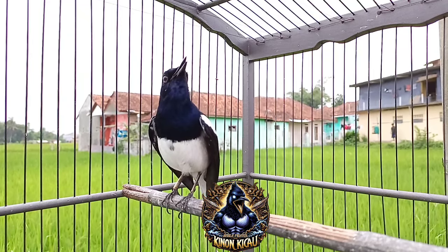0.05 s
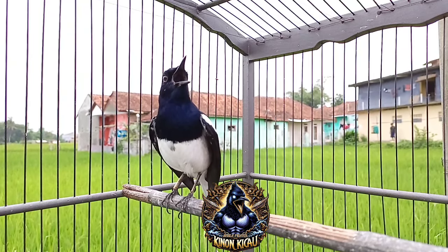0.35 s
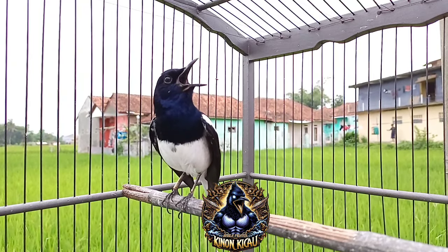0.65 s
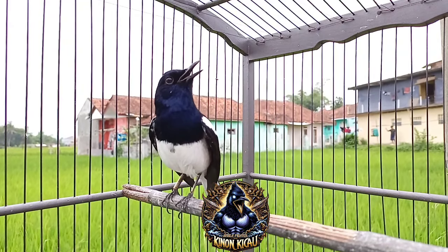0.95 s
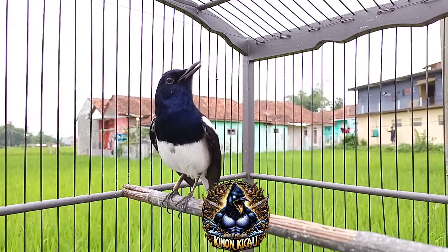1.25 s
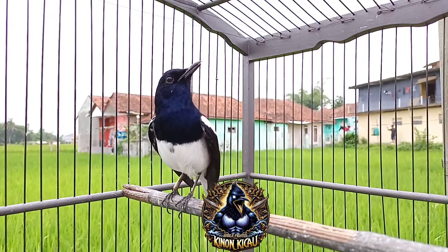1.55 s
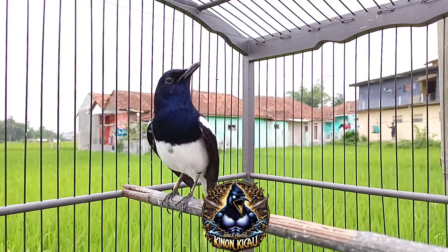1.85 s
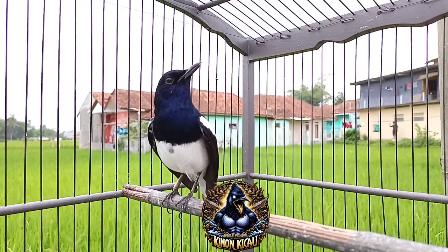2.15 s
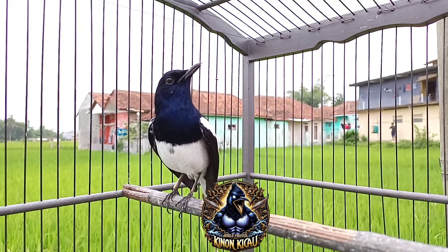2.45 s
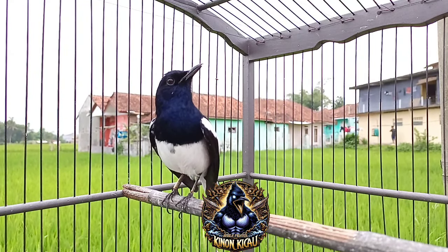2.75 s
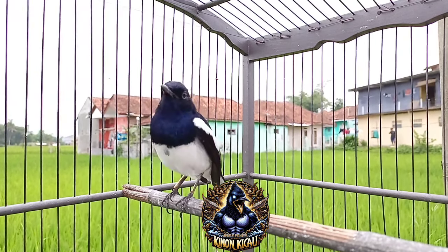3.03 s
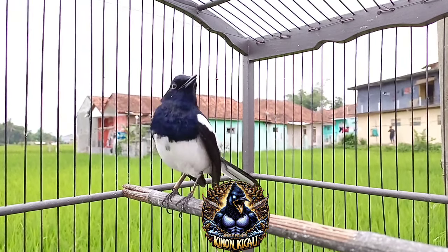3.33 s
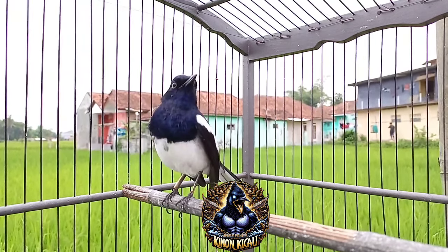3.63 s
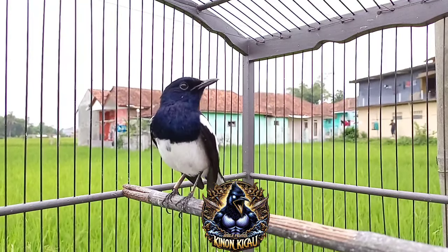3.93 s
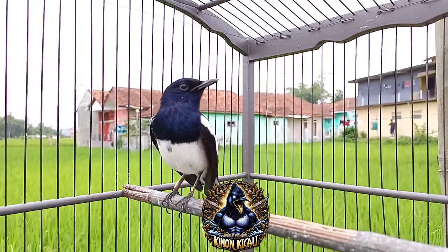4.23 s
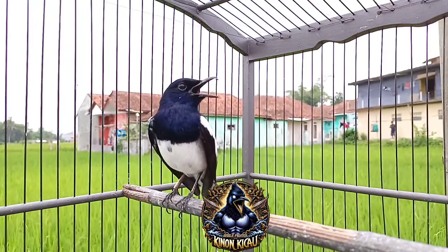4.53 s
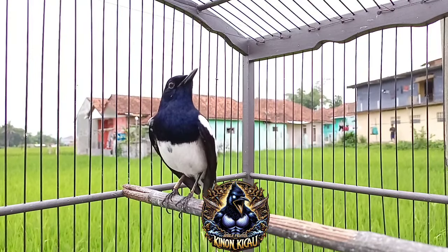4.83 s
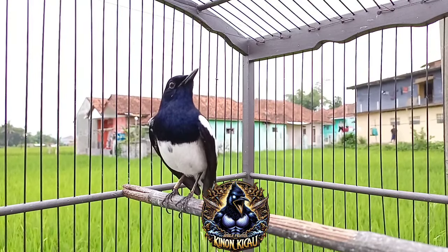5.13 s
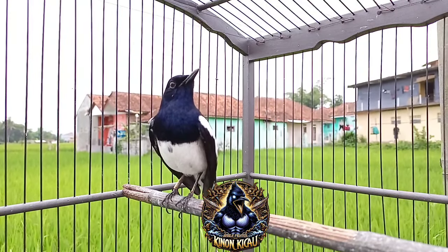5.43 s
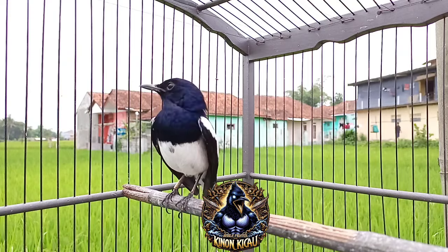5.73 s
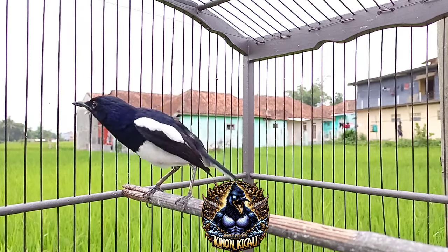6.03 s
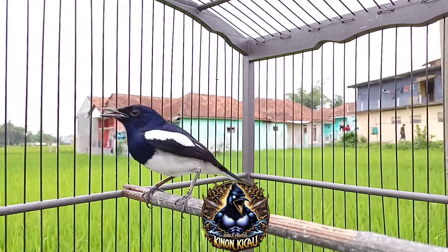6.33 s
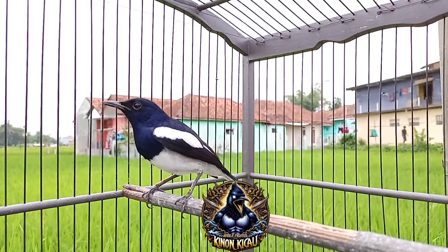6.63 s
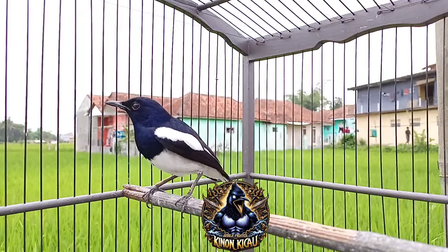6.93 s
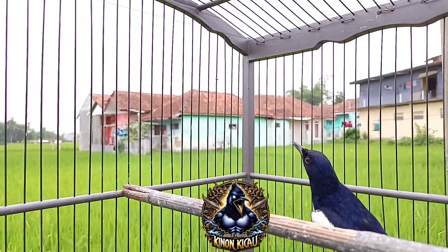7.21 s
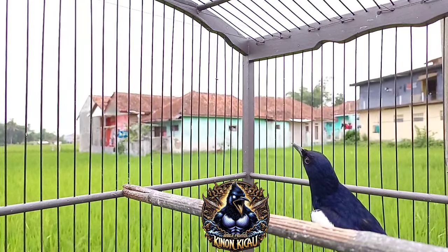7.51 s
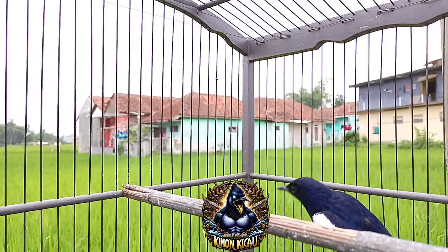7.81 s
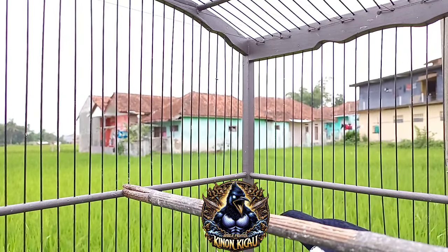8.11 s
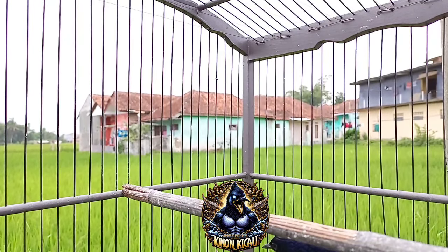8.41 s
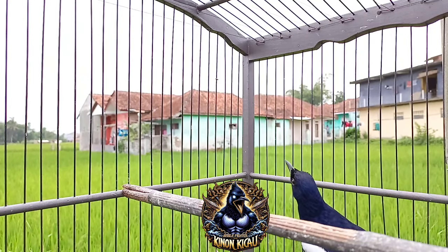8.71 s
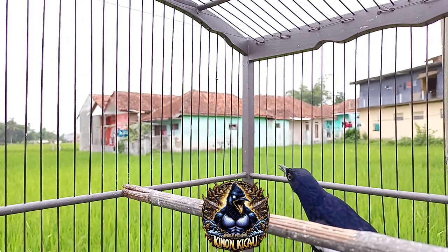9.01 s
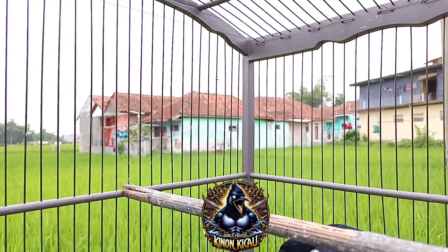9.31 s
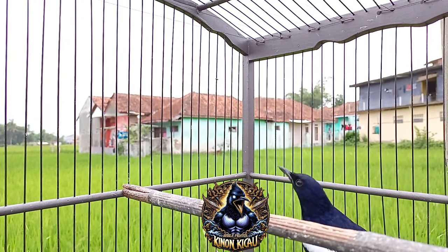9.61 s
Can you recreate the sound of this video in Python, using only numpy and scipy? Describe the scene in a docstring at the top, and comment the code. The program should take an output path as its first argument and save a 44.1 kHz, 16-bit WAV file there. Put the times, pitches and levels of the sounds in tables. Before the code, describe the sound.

A songbird opens close to the microphone with a loud burst of high whistles and quick trilled sweeps. It stops, and farther birds whistle and chack softly with some echo, among a few light ticks and puffs of wind. The near bird gives one short harsh call midway and another near the end. Late on, a faint motor hums and a distant see-saw song starts, over low outdoor rumble and thin hiss.

```python
"""A caged magpie-robin opens close by with 1.6 s of loud whistles and trilled sweeps; the two sides of
its syrinx overlap and beat. Farther birds whistle and chack on, with more echo, among a few light ticks
and wind puffs. The near bird gives a harsh call at 4.7 s. A far motor swells after 7 s, then a see-saw
song starts and the second harsh call follows at 9 s. Low outdoor rumble and thin hiss run throughout."""
import sys
import numpy as np
from scipy import signal
from scipy.fft import rfft, irfft, next_fast_len
from scipy.io import wavfile
from scipy.ndimage import uniform_filter1d, minimum_filter1d

SR = 44100
rng = np.random.default_rng(int(sys.argv[2]) if len(sys.argv) > 2 else 0)


def unload_audio(sound):
    """Save the sound as a 16-bit wav file, at the path given as the first command line argument."""
    columns = np.transpose(np.atleast_2d(sound))
    # keep every value between -1 and 1, then stretch to whole-number steps
    steps = np.round(np.clip(columns, -1, 1) * 32767)
    wavfile.write(sys.argv[1], SR, steps.astype(np.int16))


N = 426006

# opening whistles: overtones/dB, pressed/0-1, [t/s, f/Hz, level/dB]
WHISTLES = [ (-30, .1, [(0, 2581, -6), (.02, 2561, -6), (.03, 2537, -15), (.043, 2500, -32)]),
            (-18, .45, [(0.172, 2174, -40), (0.18, 2181, -31.5), (0.21, 1963, -24.5), (0.244, 2282, -13),
            (0.266, 2270, -17), (0.28, 2251, -28.5)]), (-31, .1, [(0.256, 3510, -35), (0.264, 3606, -26.5),
            (0.294, 3489, -11), (0.338, 3657, -4.5), (0.372, 3700, -4), (0.386, 3577, -10),
            (0.398, 3550, -28)]), (-33.5, 0.44, [(0.476, 4755, -12), (0.486, 4774, -6.5), (0.5, 5010, -8),
            (0.508, 4682, -11.5)]), (-19.5, 0.22, [(.551, 5370, -22), (.559, 6246, -8.5), (.567, 6560, -14),
            (.576, 5930, -6.5), (.584, 6230, -5), (.606, 6463, -16), (.626, 6420, -12.5), (.655, 6202, -5),
            (.672, 6050, -12.5), (.682, 5690, -33.5)]), ]
# air rasp as one side of the syrinx hands over to the other: t/s, length/s, level/dB
HANDOVERS = [(0.176, 0.033, -44), (0.248, 0.032, -33), (0.5, 0.088, -38), (1.297, 0.034, -28.5),
             (1.563, 0.047, -35.5)]
# sweeps: t/s, length/s, climb/(Hz/s), top/Hz, level/dB
SWEEPS = [(0.762, 0.038, 135000, 4438, -6.5), (0.939, .021, 81300, 3730, -7.5),
          (1.141, 0.027, 105000, 4980, -8.5), (1.292, .027, 65500, 4170, -8.5),
          (1.507, 0.025, 58200, 3635, -7)]
# trills: t/s, length/s, hold/s, from/Hz, to/Hz, slide at/s, depth/Hz, level/dB, overtones/dB
TRILLS = [ (0.501, .03, 0.016, 4880, 3163, .013, 219, -9, -15),
          (0.802, 0.06, 0.046, 2975, 4390, 0.042, 170, -6.5, -15.5),
          (.957, 0.07, 0.037, 2758, 4310, .022, 198.6, -7, -15.5),
          (1.159, 0.068, 0.037, 2995, 4150, .026, 320, -8, -14),
          (1.311, .057, 0.034, 2407, 3997, .016, 40, -5, -25.5),
          (1.529, .039, .042, 2854, 3290, .006, 70, -4.5, -34.5),
          (1.565, .055, .03, 2900, 2102, .017, 150, -4, -18), ]
# closing pips: t/s, length/s, f/Hz, level/dB
PIPS = [(0.849, 0.019, 4630, -12.5), (0.996, .027, 5430, -12.5), (1.194, 0.032, 4654, -9.5),
        (1.357, 0.015, 4520, -17)]
# harsh calls: t/s, zigzag length/s, start/Hz, squeal/Hz, drop t/s, drop length/s, level/dB
HARSH_CALLS = [(4.7, .025, 4580, 5500, 4.758, 0.037, -15.5), (8.988, .031, 5915, 5840, 9.055, 0.04, -14.5)]
# squeals, one curve per call: t/s, f/Hz, level/dB
SQUEALS = [
    [(4.724, 5380, -14.5), (4.73, 5490, -20), (4.734, 5500, -44), (4.742, 5260, -46), (4.746, 4950, -23),
     (4.757, 3310, -15)],
    [(9.018, 5970, -10), (9.025, 5300, -12), (9.033, 5960, -9), (9.042, 3140, -16), (9.051, 3940, -22.5),
     (9.056, 3300, -10)],
]
# throat and beak responses: f/Hz, level/dB
WHISTLE_EQ = [(3500, -2.5), (6300, 0.5), (7800, -12), (10500, 4.5), (12800, 0), (13500, -6.5), (15200, 1)]
PRESSED_EQ = [(3800, -8.5), (6300, 2), (7900, -10), (9200, 1), (11000, 3), (13400, -13), (14600, 3)]
HANDOVER_EQ = [(2000, -14), (3500, 0), (6500, -0.5), (8000, -8), (11000, -2), (13300, -10), (15000, -3)]
HARSH_EQ = [(600, -22), (1000, -12.5), (1700, -14), (2300, -9.5), (3200, -1), (5000, -1), (6600, 8.5),
            (8000, -6), (9500, -3.5), (12500, -25.5), (15500, -12.5)]
FAR_HARSH_EQ = [(1000, -48), (2200, -2), (4600, 6.5), (8000, -14), (9700, -10.5), (12500, -25)]
# the cage favours some pitches, so glides flutter: f/Hz, level/dB
CAGE_EQ = [(2250, -11), (2700, -10.5), (2950, -5), (3200, -1.5), (3500, -7), (3780, 1), (4200, -3.5),
           (4460, -0.5), (4900, -5)]

# neighbours' whistles: t/s, length/s, start/Hz, end/Hz, level/dB
HELD_NOTES = [(2.184, 0.16, 3357, 3465, -34.5), (2.5, 0.13, 3095, 3175, -44),
              (2.666, 0.081, 3000, 3200, -34.5), (6.115, 0.093, 3430, 3507, -33.5),
              (6.685, 0.156, 3437, 3487, -33.5), (8.455, 0.079, 3060, 3220, -33.5)]
SLURS = [ (0.334, 0.16, 2030, 1774, -54.5), (0.678, 0.15, 4100, 4240, -54.5), (1.381, .12, 5470, 6520, -54),
         (6.538, 0.078, 3030, 3414, -47.5), (0.556, 0.14, 2743, 2570, -49), (.88, .12, 1604, 2234, -51),
         (1.578, 0.22, 3124, 3468, -46), (2.168, 0.52, 2675, 3130, -48), (2.699, .07, 2993, 2300, -50.5),
         (3.279, 0.039, 1653, 1340, -62), (3.36, 0.057, 1850, 1430, -60), (3.889, 0.061, 3215, 3545, -57),
         (4.861, 0.17, 3040, 3633, -60.5), (5.92, 0.23, 2800, 3406, -48.5),
         (7.299, 0.12, 3950, 4115, -57.5), (7.434, 0.099, 4690, 4640, -46), (7.52, 0.1, 4650, 4510, -52),
         (7.521, 0.2, 5695, 5430, -57), (7.707, 0.13, 2307, 2384, -61), (7.819, 0.13, 4180, 2003, -59.5),
         (8.279, 0.13, 2998, 3460, -43.5), (8.436, 0.098, 2940, 3187, -44),
         (8.561, 0.097, 3090, 1540, -47.5), ]
PHRASE = [(0, .12, 3190, 2393, -49), (.18, .16, 2643, 3240, -45), (0.658, .11, 3216, 2472, -46),
          (.862, .1, 2920, 3160, -42), (.97, 0.074, 3130, 2406, -51)]  # t from phrase start
# phrase starts: t/s
PHRASE_STARTS_S = [1.8, 6.3]
# see-saw song: t/s, start/Hz, flip after/s, level/dB
SEESAWS = [(8.738, 3907, 0.084, -39.5), (9.096, 4313, 0.081, -37.5), (9.476, 4466, 0.092, -38)]
# chack series: t/s, level/dB
CHACKS = [(2.81, -59), (3.168, -46), (3.383, -54), (3.594, -46.5), (3.805, -51), (4.022, -53.5),
          (4.247, -58)]
# hoarse glides: t/s, length/s, start/Hz, end/Hz, level/dB, roughness (capped at 1)
FAR_CHIPS = [ (2.42, .19, 3380, 3004, -53, 0.75), (2.241, 0.063, 3620, 4700, -58, .4),
             (3.5, 0.078, 2800, 5290, -41, .45), (3.569, .24, 4920, 4160, -53, .6),
             (4.351, 0.067, 3300, 4300, -60, .15), (4.567, 0.03, 4450, 3080, -55, .1),
             (5.07, .05, 5600, 3750, -63.5, .7), (5.226, 0.067, 3340, 2770, -58, 1.1),
             (5.406, .036, 5000, 3710, -54.5, 0.39), (5.805, 0.1, 6080, 3770, -57, 0.82),
             (7.058, 0.044, 4500, 4320, -52, 0.48), ]
# chirp bursts: t/s, length/s, level/dB
TWITTERS = [(4.88, .02, -59), (5.881, .09, -51.5), (6.03, .08, -55), (6.139, .02, -55), (6.59, .02, -53)]
# cracked call curve: t/s, f/Hz, level/dB
CRACKED_CALL = [(2.95, 5100, -54.5), (3.02, 4560, -42.5), (3.06, 4126, -44), (3.1, 5050, -47),
                (3.155, 5350, -46), (3.21, 3500, -48)]

# light ticks, wind puffs: t/s, level/dB
TICKS = [(1.966, -35.5), (3.083, -42), (6.277, -37), (7.245, -44.5), (7.504, -40.5)]
BUFFETS = [(2.129, -44), (2.24, -51.5), (2.78, -50.5), (3.35, -44.5), (3.92, -45.5), (4.0, -38),
           (4.13, -45), (4.23, -41), (4.37, -46), (6.599, -45)]
# noise spectra: f/Hz, level/dB
TICK_EQ = [(500, -29), (1500, -19), (3000, 9.5), (5500, -2.5), (9000, -13.5), (15000, -31)]
RUMBLE_EQ = [(25, -42.5), (65, -3), (120, 0), (260, -13.5), (450, -21), (600, -16), (800, -35.5),
             (2000, -67)]
WASH_EQ = [(600, -27.5), (1200, -8.5), (1600, -5), (2500, -20), (5000, -60)]
HISS_EQ = [(600, -0.5), (800, -11.5), (2300, -25.5), (3500, -18), (4700, -18), (5200, -21), (7800, -25.5),
           (9600, -10), (11500, -32), (16000, -39)]
# background envelopes: t/s, level/dB
INSECT_DB = [(0, -72), (4.1, -76), (5.6, -70.5), (7.6, -68.5), (7.9, -89)]
RUMBLE_DB = [(0, -51.5), (.35, -74), (.65, -58), (.9, -53.5), (1.5, -64), (2.2, -55), (2.6, -60.5),
             (4.1, -53), (4.6, -56), (5.4, -69), (6.2, -54), (6.65, -53.5), (7.1, -55.5), (9.66, -62)]
WASH_DB = [(0, -45), (.4, -73.5), (1.2, -67), (3.3, -76), (4.2, -85), (5.4, -82), (6.2, -64), (7.1, -83),
           (7.7, -71), (8.3, -88), (9.66, -78.5)]
HISS_DB = [(0, -68.5), (1.6, -66.5), (3.2, -62.5), (5.3, -65.5), (6.5, -63), (7.6, -63.5), (8.2, -66.5),
           (9.66, -65.5)]
MOTOR_DB = [(7.1, -77), (7.5, -49), (7.75, -58), (8.0, -53), (8.35, -52.5), (8.55, -65), (8.75, -53.5),
            (9.1, -65.5), (9.35, -52.5), (9.66, -65.5)]
# thin far hum: f/Hz, level/dB re hiss, waver/fraction
HUM = [(577, -7.5, 0.037)]
# echo decay before t60_factor: f/Hz, T60/s
ECHO_T60_S = [(2500, .8), (6000, .85), (10000, .6), (13000, .45), (16000, 0.052)]


def song(coupling=.05):
    """Both sides of the syrinx sound together and mix into sum tones."""
    out = np.zeros(N)
    for overtones_db, pressed, rows in WHISTLES:
        at_s, hz, db = follow(rows)
        add(out, at_s, note(hz, db, overtones_db, pressed, WHISTLE_EQ))
    for at_s, length_s, db in HANDOVERS:
        size = round(length_s * SR)
        add(out, at_s, amp(db) * np.hanning(size) * noise(size, HANDOVER_EQ))
    out += place(sweep, SWEEPS) + place(trill, TRILLS) + place(pip, PIPS)
    return highpass(out, 1550) + coupling * highpass(out ** 2, 5000)


def sweep(length_s, climb_hz_per_s, top_hz, db, from_hz=2404, rise_s=.0046):
    """One side of the syrinx shoots up to a top pitch."""
    t, _ = clock(length_s)
    hz = uniform_filter1d(np.minimum(from_hz + climb_hz_per_s * t, top_hz), size=200)
    return note(hz, db + read(CAGE_EQ, hz), overtones_db=-29.5, pressed=.86) * (1 - np.exp(-t / rise_s))


def trill(length_s, hold_s, from_hz, to_hz, slide_at_s, depth_hz, db, overtones_db):
    """The other side warbles while sliding between two pitches."""
    rate_hz, slide_s, rise_s, fade_db_per_s = 134.6, .006, .007, 749.5
    t, _ = clock(length_s)
    release_s = np.maximum(t - hold_s, 0)
    warble = np.cos(phase_of(rate_hz * (1 + .082 * wander(len(t), 52))))
    centre_hz = from_hz + (to_hz - from_hz) / (1 + np.exp((slide_at_s - t) / slide_s))
    hz = centre_hz + depth_hz * warble * np.exp(-release_s / .012)
    tone = note(hz, db + read(CAGE_EQ, hz) - fade_db_per_s * release_s, overtones_db, pressed=1)
    return tone * np.sqrt(np.minimum(t / rise_s, 1))


def pip(length_s, hz, db, sag=.0647, fade_db=16):
    """A short sagging note closes a syllable."""
    _, u = clock(length_s)
    return note(hz * (1 + sag * (.5 - u)), db - fade_db * u ** 3, overtones_db=-29.5, pressed=.35)


def note(hz, db, overtones_db, pressed, eq=PRESSED_EQ):
    """One side of the syrinx; the more pressed, the more it rasps."""
    size = len(hz)
    jitter = 1 + .005 * pressed * wander(size, 600)
    tone = whistle(hz * jitter, overtones_db, fall_db=7 * pressed, eq=eq, grain_db=3.5 * pressed)
    air = amp(-33) * pressed ** 2 * highpass(noise(size, eq), 4000)
    shimmer = 1 + .018 * pressed * wander(size, 1500)
    flutter_db = 1.17 * pressed * wander(size, 200)
    return soften((tone * shimmer + air) * amp(db + flutter_db), edge_s=.0035)


def whistle(hz, overtones_db, fall_db, eq=WHISTLE_EQ, grain_db=1):
    """Near-pure tone; closing membranes add weak overtones, coloured by the beak."""
    phase = phase_of(hz)
    overtones = np.zeros(len(hz))
    for k in range(2, 8):
        db = read(eq, k * hz) - fall_db * (k - 2) + grain_db * wander(len(hz), 300)
        overtones += amp(db) * (k * hz < SR / 2) * np.sin(k * phase)
    return np.sqrt(2) * (np.sin(phase) + amp(overtones_db) * overtones)


def harsh_calls():
    """The near bird zigzags up to a squeal, then drops into a rattle."""
    out = np.zeros(N)
    for at_s, length_s, start_hz, squeal_hz, drop_at_s, drop_length_s, db in HARSH_CALLS:
        add(out, at_s, zigzag(length_s, start_hz, squeal_hz, db))
        add(out, drop_at_s, rattle(drop_length_s, db - 2.5))
    for rows in SQUEALS:
        at_s, hz, db = follow(rows)
        add(out, at_s, harsh_voice(hz, db, rough=.094))
    return highpass(amp(-1) * out + amp(-15) * echo(out, t60_factor=.066, delay_s=.000998), 600)


def zigzag(length_s, start_hz, squeal_hz, db, centre_hz=3234, depth_hz=630, cycles=2.4, rough=.22):
    """Swinging pitch, with a half-pitch tone at the onset."""
    _, u = clock(length_s)
    swing_hz = centre_hz + depth_hz * np.cos(2 * np.pi * cycles * (u - .56))
    leaving, arriving = np.exp(-(u / .2) ** 2), np.exp(-((1 - u) / .14) ** 2)
    hz = swing_hz + (start_hz - swing_hz) * leaving + (squeal_hz - swing_hz) * arriving
    return harsh_voice(hz, db - 9 * leaving, rough) + harsh_voice(hz / 2, db - 3.5 - 45 * u ** 2, rough)


def rattle(length_s, db, from_hz=3200, to_hz=984, drop_s=.0045, fade_db=26):
    """The voice plunges, catches once and roughens."""
    t, u = clock(length_s)
    catch_hz = 520 * np.exp(-((t - .013) / .004) ** 2)
    hz = to_hz + (from_hz - to_hz) * np.exp(-t / drop_s) + catch_hz
    return harsh_voice(hz, db - fade_db * u ** 2, rough=.34 * u ** .32)


def harsh_voice(hz, db, rough):
    """A stretch of pressed, fluttering voice."""
    gain = amp(db + 2.05 * wander(len(hz), 580))
    return soften(gain * rasp(hz, rough, HARSH_EQ, jitter=.152, hiss=.26), edge_s=.0014)


def rasp(hz, rough, throat_eq, jitter, hiss):
    """Unsteady pulses and air noise, rippling each cycle, pass the throat."""
    rough = np.clip(rough, 0, 1)
    phase = phase_of(hz * (1 + jitter * rough * wander(len(hz), 1400)))
    k = np.arange(1, 17)[:, None]
    weight = amp(read(throat_eq, k * hz)) * (k * hz < SR / 2) / k ** .32
    pulses = np.sqrt(2) * (weight * np.cos(k * phase)).sum(0) / np.linalg.norm(weight, axis=0)
    air = unit(highpass(noise(len(hz), throat_eq), .92 * hz.min()) * (1 + .083 * np.cos(phase)))
    air_share = np.clip(hiss * rough ** 1.58, 0, 1)
    return np.sqrt(1 - air_share) * pulses + np.sqrt(air_share) * air


def held_notes(swell_db=4):
    """A neighbour's firm whistles, swelling towards the end."""
    out = np.zeros(N)
    for at_s, length_s, start_hz, end_hz, db in HELD_NOTES:
        _, u = clock(length_s)
        hz = start_hz + (end_hz - start_hz) * np.sin(np.pi / 2 * u)
        tone = whistle(hz, overtones_db=-30.5, fall_db=19.5)
        add(out, at_s, soften(amp(db - swell_db * (1 - u)) * tone, edge_s=.026))
    return out


def far_birds():
    """A repeated phrase, single slurs, a see-saw song, chacks and hoarse glides."""
    out = np.zeros(N)
    for at_s in PHRASE_STARTS_S:
        add(out, at_s, place(slur, PHRASE))
    out += place(slur, SLURS) + seesaw()
    for at_s, db in CHACKS:
        add(out, at_s, chip(length_s=.053, start_hz=2400, end_hz=1756, db=db, rough=.54))
    return out + place(chip, FAR_CHIPS)


def seesaw(scoop_hz=717, flip_hz=1860, flip_s=.004, hold_s=.024, fall_after_s=.15):
    """A scoop flips upward, then a fall; heard partly via the walls."""
    out = np.zeros(N)
    for at_s, start_hz, flip_at_s, db in SEESAWS:
        t, u = clock(flip_at_s + hold_s)
        hz = start_hz + scoop_hz * np.minimum(t / flip_at_s, 1) ** 2
        hz += flip_hz / (1 + np.exp((flip_at_s - t) / flip_s))
        add(out, at_s, far_note(hz, db - 6.5 * u ** 4, overtones_db=-19.5, jitter=.013))
        add(out, at_s + fall_after_s, slur(length_s=.18, start_hz=4300, end_hz=2799, db=db - 5, ease=4.6))
    return amp(-2) * out + amp(-3) * echo(out, t60_factor=.24, delay_s=.0037)


def slur(length_s, start_hz, end_hz, db, ease=None):
    """A far whistle glides fast, then settles; by default less so when falling."""
    _, u = clock(length_s)
    ease = ease or (2.6 if end_hz > start_hz else .97)
    return far_note(start_hz + (end_hz - start_hz) * np.expm1(-ease * u) / np.expm1(-ease), db)


def far_note(hz, db, overtones_db=-29, jitter=.027):
    """A far whistle swells, wavers and fades."""
    size = len(hz)
    waver = jitter * np.ptp(hz) / hz.mean() * wander(size, 300) + .004 * wander(size, 35.004)
    tone = whistle(hz * (1 + waver), overtones_db, fall_db=22.5)
    arch = abs(np.sin(np.pi * np.linspace(0, 1, size) ** .88)) ** .7
    return wall_bounces(amp(db + .77 * wander(size, 45)) * tone * arch)


def chip(length_s, start_hz, end_hz, db, rough):
    """A short hoarse glide."""
    hz = np.geomspace(start_hz, end_hz, round(length_s * SR))
    return soften(amp(db) * rasp(hz, rough, FAR_HARSH_EQ, jitter=.114, hiss=1), length_s / 3)


def twitter(gap_s=.056, top_hz=5600, bottom_hz=3800):
    """Tiny falling chirps, uneven in time, pitch and level."""
    out = np.zeros(N)
    for burst_s, length_s, db in TWITTERS:
        for at_s in np.arange(burst_s, burst_s + length_s, gap_s):
            late, shift, loud = rng.standard_normal(3)
            hz = np.geomspace(top_hz, bottom_hz, SR // 45) * (1 + .15 * shift)
            chirp = 2 * np.hanning(len(hz)) * np.sin(phase_of(hz))
            add(out, at_s + gap_s * late / 10, amp(db + 2 * loud) * chirp)
    return out


def cracked_call(break_db=4.5):
    """A hoarse voice dips and climbs, breaking up in pitch and level."""
    out = np.zeros(N)
    at_s, hz, db = follow(CRACKED_CALL)
    hz = hz * (1 + .0248 * wander(len(hz), 256))
    voice = rasp(hz, rough=.24, throat_eq=FAR_HARSH_EQ, jitter=.12, hiss=.69)
    breaks = unit(amp(break_db * wander(len(hz), 110)))
    add(out, at_s, soften(amp(db) * breaks * voice, edge_s=.0035))
    return out


def tick(db, t60_s=.02):
    """A small tap that dies at once."""
    t = np.arange(2048) / SR
    return amp(db - 60 * t / t60_s) * noise(len(t), TICK_EQ)


def insect(hz=4720):
    """A soft grainy trill that fades out near the end."""
    return level(INSECT_DB) * amp(2 * wander(N, 9)) * unit(np.sin(wavering_phase(hz, .03, rate_hz=400)))


def buffet(db, rise_s=.02, band_hz=(67, 193)):
    """A low puff of wind: quick swell, slower fall."""
    t = np.arange(SR // 4) / SR
    band = signal.butter(3, band_hz, "band", fs=SR, output="sos")
    puff = unit(signal.sosfilt(band, rng.standard_normal(len(t))))
    return amp(db) * puff * t / rise_s * np.exp(1 - t / rise_s)


def rumble(gust_db=3):
    """Gusty low outdoor noise."""
    low = patchy(noise(N, RUMBLE_EQ), patch_db=2.5)
    return highpass(low * level(RUMBLE_DB) * amp(gust_db * wander(N, 29)), 38)


def far_wash(tones_hz=(1100, 1500)):
    """Echoes of two wavering tones in patchy noise."""
    tones = sum(np.sin(wavering_phase(hz, .1, rate_hz=7.4)) * amp(2 * wander(N, 10)) for hz in tones_hz)
    smeared = unit(echo(tones, t60_factor=.52, delay_s=0))
    return unit(smeared + 1.7 * patchy(noise(N, WASH_EQ), patch_db=5.5)) * level(WASH_DB)


def hiss_and_hum():
    """Thin hiss and a far hum under one envelope."""
    out = patchy(noise(N, HISS_EQ), patch_db=3) * amp(1.5 * wander(N, 2.3))
    for hz, db, waver in HUM:
        out += amp(db + 1.3 * wander(N, 9)) * unit(np.sin(wavering_phase(hz, waver, rate_hz=60)))
    return out * level(HISS_DB)


def motor(hz=116.4):
    """A far motor: three harmonics of an unsteady pitch."""
    phase = wavering_phase(hz, .039, rate_hz=12)
    tone = unit(np.sin(phase) + amp(-9.5) * np.sin(2 * phase) + amp(-14.5) * np.sin(3 * phase))
    return level(MOTOR_DB) * amp(1.5 * wander(N, 6)) * tone


def echo(x, t60_factor, delay_s, taps_per_s=3000):
    """Scattered reflections off walls and roofs; treble dies first."""
    taps = rng.standard_normal(SR) * (rng.random(SR) < taps_per_s / SR)
    hz, t, spectra = signal.stft(taps, SR, nperseg=256)
    t60_s = t60_factor * read(ECHO_T60_S, hz)[:, None]
    tail = signal.istft(spectra * amp(-60 * t / t60_s), SR, nperseg=256)[1]
    tail = np.pad(tail, (round(delay_s * SR), 0))
    return signal.fftconvolve(x, tail / np.linalg.norm(tail))[:N]


def wall_bounces(x, paths=4):
    """Each far note takes its own few paths off the house walls."""
    out = np.pad(x, (0, SR // 4))
    for lag, strength in rng.random((paths, 2)):
        delay_s = .17 * (.12 + .85 * lag)
        add(out, delay_s, amp(-16) * strength * x)
    return out


def patchy(x, patch_db):
    """Distant sound swells and sinks in patches of time and pitch."""
    spectra = signal.stft(x, nperseg=1024)[2]
    field = uniform_filter1d(rng.standard_normal(spectra.T.shape), size=9, axis=0)
    field = unit(uniform_filter1d(field, size=6, axis=1)).T
    return unit(signal.istft(spectra * amp(patch_db * field), nperseg=1024)[1][:N])


def amp(db):
    """dB to gain."""
    return 10 ** (np.asarray(db) / 20)


def unit(x):
    """Scale to rms 1."""
    return x / np.sqrt(np.mean(x ** 2) + 1e-20)


def clock(length_s):
    """Time t/s and elapsed fraction u."""
    t = np.arange(max(round(length_s * SR), 64)) / SR
    return t, t / t[-1]


def phase_of(hz):
    """Running phase/rad."""
    return 2 * np.pi * np.cumsum(hz) / SR


def wavering_phase(hz, waver, rate_hz):
    """Scene-long phase/rad of an unsteady pitch."""
    return phase_of(hz * (1 + waver * wander(N, rate_hz)))


def read(table, hz):
    """Table lookup on a log-frequency axis."""
    table_hz, value = np.transpose(table)
    return np.interp(np.log(hz + 1), np.log(table_hz + 1), value)


def follow(rows):
    """Start time and per-sample columns of a curve."""
    times_s, *columns = np.transpose(rows)
    t, _ = clock(times_s[-1] - times_s[0])
    return [times_s[0]] + [np.interp(times_s[0] + t, times_s, column) for column in columns]


def level(rows):
    """Envelope table to scene-long gain."""
    return amp(np.interp(np.arange(N) / SR, *np.transpose(rows)))


def add(mix, at_s, sound):
    """Mix in at at_s."""
    part = mix[round(at_s * SR):][:len(sound)]
    part += sound[:len(part)]


def place(source, rows):
    """One sound per row: start time, then the source's arguments."""
    out = np.zeros(N)
    for at_s, *settings in rows:
        add(out, at_s, source(*settings))
    return out


def noise(size, eq):
    """Shaped noise, rms 1."""
    gain = amp(read(eq, np.fft.rfftfreq(size, 1 / SR)))
    return unit(irfft(rfft(rng.standard_normal(size)) * gain, size))


def wander(size, rate_hz):
    """Smooth random motion, rms about 1."""
    padded = next_fast_len(size + SR // 8)
    lowpass = np.exp(-(np.fft.rfftfreq(padded, 1 / SR) / rate_hz) ** 2)
    return unit(irfft(rfft(rng.standard_normal(padded)) * lowpass, padded))[:size]


def soften(x, edge_s):
    """Fade both ends."""
    t = np.arange(len(x)) / SR
    return x * np.sin(np.pi / 2 * np.minimum(np.minimum(t, t[::-1]) / edge_s, 1)) ** 2


def highpass(x, hz):
    """Fourth-order low cut."""
    return signal.sosfilt(signal.butter(4, hz, "high", fs=SR, output="sos"), x)


def scene():
    """Near bird almost dry; more echo with distance."""
    near = song() + harsh_calls()
    near += (amp(-21) * echo(near, t60_factor=.1, delay_s=.0021)
             + amp(-40) * echo(near, t60_factor=1, delay_s=.017))
    near += amp(-29) * echo(highpass(near, 3900), t60_factor=.28, delay_s=.012)  # treble reaches walls
    ticks = place(tick, TICKS)
    middle = held_notes() + ticks + amp(-5) * echo(ticks, t60_factor=.25, delay_s=.002)
    middle += amp(-12) * echo(middle, t60_factor=.81, delay_s=.025)
    far = far_birds() + twitter() + cracked_call()
    far += (amp(-6) * echo(far, t60_factor=.28, delay_s=.002)
            + amp(-10.5) * echo(far, t60_factor=.99, delay_s=.012))
    background = insect() + rumble() + place(buffet, BUFFETS) + far_wash() + hiss_and_hum() + motor()
    return (near + middle + far + background)[None]


def record(dry):
    """Fast peak limiter, then band limit."""
    ceiling, cutoff_hz = .98, 15800
    gain = 1 / np.maximum(abs(dry) / ceiling, 1)
    gain = uniform_filter1d(minimum_filter1d(gain, size=129), size=129)
    lowpass = signal.firwin(401, cutoff_hz, window=("kaiser", 9), fs=SR)
    return signal.oaconvolve(dry * gain, lowpass[None], "same")


dry = scene()
out = record(dry)
unload_audio(out)
```